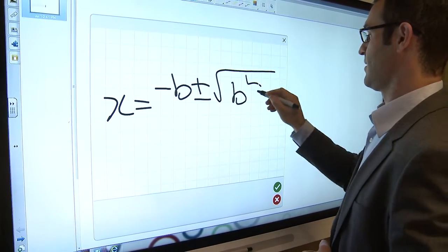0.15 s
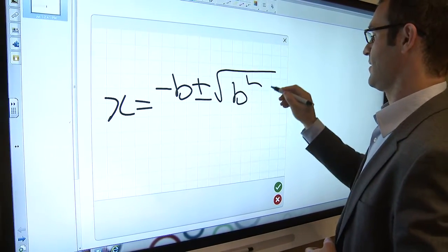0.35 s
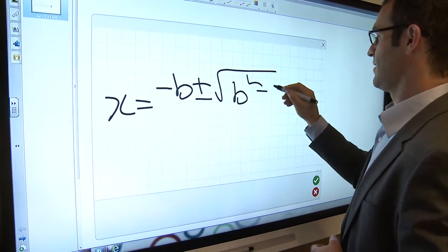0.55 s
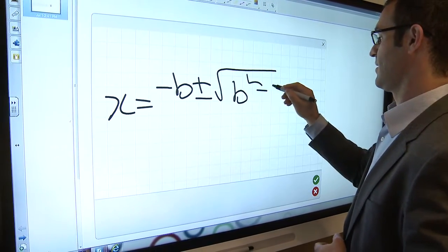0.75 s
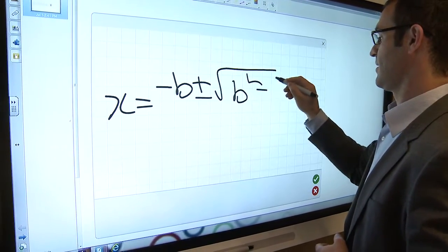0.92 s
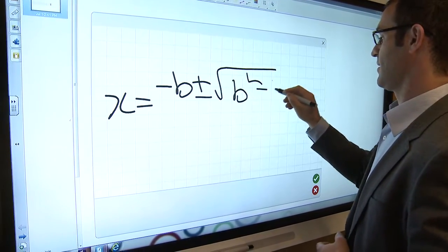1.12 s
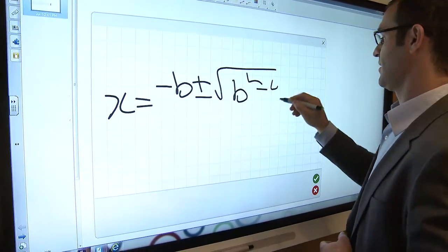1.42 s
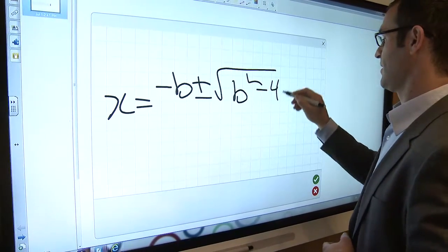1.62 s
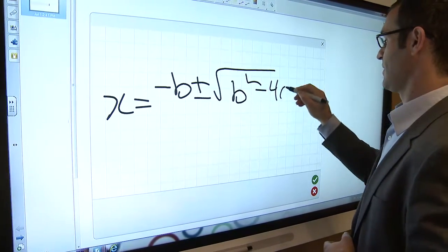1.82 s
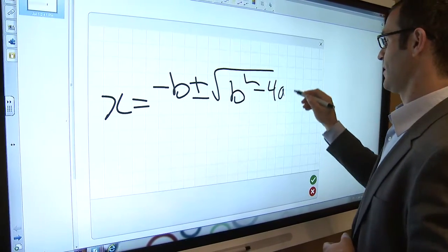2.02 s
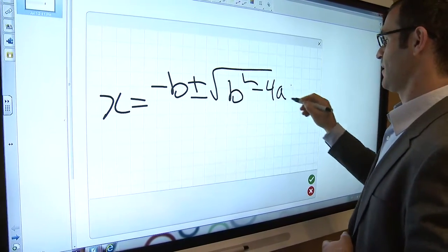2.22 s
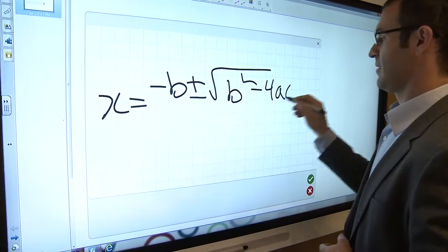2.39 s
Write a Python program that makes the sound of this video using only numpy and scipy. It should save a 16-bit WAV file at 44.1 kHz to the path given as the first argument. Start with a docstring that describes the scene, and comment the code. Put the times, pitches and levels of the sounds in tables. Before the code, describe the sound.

Hollow taps of a pen tip on a big glass panel, with faint writing hiss between them

```python
"""A quiet room with a large glass display, a writer at work on it with a stylus, one microphone.
Each touch-down knocks the panel, which booms briefly in its low modes and rattles its frame and casing.
The tip then slides with a faint hiss, filtered noise that follows the pen's speed.
The writer's sleeve rustles and he shifts his weight with soft thuds as he finishes, both shaped noise;
ventilation hums behind as steady noise and a few wavering tones."""
import sys
import numpy as np
from scipy import signal
from scipy.fft import rfft, irfft, next_fast_len
from scipy.io import wavfile
from scipy.ndimage import map_coordinates

SR = 44100
rng = np.random.default_rng(int(sys.argv[2]) if len(sys.argv) > 2 else 0)


def output_pcm(signal):
    """Save a mono or channel-first signal as 16-bit PCM at the path in sys.argv[1].

    Samples are clipped to [-1, 1] before scaling.
    """
    pcm = np.clip(np.atleast_2d(signal).T, -1, 1) * 32767
    wavfile.write(sys.argv[1], SR, np.round(pcm).astype(np.int16))


N = 112454  # length in samples

# Touch-downs on the glass. Each row: start in seconds, level of the whole knock in dB, then trims in dB
# of the glass click, pen tick and frame clatter, and height on the panel from 0 to 1.
TOUCH_DOWNS = [(0.2135, 1.4, -3, 2.5, 2, 0.78), (1.0205, 1.2, -1.5, -9, 5, 0.35),
               (1.3163, -3.5, -5, 4, 0.5, 0.11), (1.601, -3, -11, 0, -5, 0), (2.1408, -3.5, -7.5, 5, 0, 0)]
# Low modes of the panel. Each row: frequency in Hz, level in dB when struck on the writing line,
# level in dB when struck at height 1, seconds to full swing. The knock's level is added to both.
PANEL_MODES = [(176, -35, -22.5, 0.014), (207.4, -61, -24, 0.018), (221.8, -13.5, -17.5, 0.0056),
               (266.6, -30, -18.5, 0.01), (310.6, -21, -22.5, 0.0045), (403.1, -18, -17, 0.0042),
               (438.8, -22.5, -56, 0.0074), (504, -32, -15.5, 0.0016), (507.2, -38.5, -34.5, .010),
               (586.1, -32, -35, 0.011), (670.6, -43, -32.5, 0.0089), (784.5, -38.5, -38, 0.0052)]
# Colours of the frame's dense upper modes, the tip's click on glass, the casing's diffuse shudder and
# the pen's own resonances. Each row: frequency in Hz, relative spectral level in dB.
FRAME_COLOUR = [(100, -53), (300, 0), (600, 6), (850, -1), (1050, -3), (1400, -21), (2500, -19.5),
                (5000, -31), (16000, -66)]
CLICK_COLOUR = [(300, -20), (1000, 6), (1700, 8.5), (2800, -0.5), (3500, -2), (4400, 5.5), (5800, -28.5),
                (10000, -18), (16000, -27)]
CASING_COLOUR = [(100, -27), (180, -12), (240, -7.5), (310, 2), (420, -2.5), (600, 0), (800, -18),
                 (1100, -30), (2000, -41), (6000, -61)]
PEN_COLOUR = [(800, -25), (2000, -11), (3400, -5.5), (4400, -0.5), (5800, -6.5), (6800, -4), (7600, 0.5),
              (8100, -3.5), (8700, 1), (9500, -8.5), (16000, -16)]
# Base levels in dB, before trim, envelope and knock level; decays to -60 dB in seconds.
CLICK_DB, CLICK_T60 = -42.5, 0.025
FRAME_DB, FRAME_T60 = -40, 0.13
TICK_DB, TICK_T60 = -61, 0.053
CASING_DB, CASING_T60 = -30, 0.22
CASING_RISE_S, CASING_HIGH_DB = 0.012, 4  # the rise's time constant; dB added at height 1
RADIATE_HZ = 140  # the panel radiates little below this
TAP_ROOM_DB = -15.5


def taps():
    """The tip clicks and pushes the panel inward; where it lands sets the balance of the modes."""
    out = np.zeros(N)
    radiation = signal.butter(2, RADIATE_HZ, "high", fs=SR, output="sos")
    for start, db, click_db, tick_db, frame_db, height in TOUCH_DOWNS:
        t = since(start)
        knock = amp(CLICK_DB + click_db) * burst(t, 0.000069, CLICK_T60) * noise(CLICK_COLOUR)
        knock += amp(FRAME_DB + frame_db) * burst(t, 0.00017, FRAME_T60) * noise(FRAME_COLOUR)
        knock += amp(TICK_DB + tick_db) * burst(t, 0.00069, TICK_T60) * noise(PEN_COLOUR)
        for hz, line_db, high_db, swell in PANEL_MODES:
            swing = t / swell * np.exp(1 - t / swell)  # peaks at 1 after the swell time
            mode_db = line_db + height * (high_db - line_db)
            # the minus sign is the inward push
            knock -= amp(mode_db) * swing * np.sin(2 * np.pi * hz * t)
        casing = burst(t, CASING_RISE_S, CASING_T60) * noise(CASING_COLOUR)
        knock += amp(CASING_DB + CASING_HIGH_DB * height) * casing
        knock = signal.sosfilt(radiation, knock)
        out += amp(db) * (knock + amp(TAP_ROOM_DB) * room(knock))
    return out


# Pen strokes across the glass. Each row: start in seconds, end in seconds, level in dB,
# moment of top speed as a fraction of the stroke, level of the fine fizz in dB relative to the pen's hiss.
PEN_STROKES = [(-.07, 0.068, -60.5, 0.7, -9), (0.233, 0.356, -60.5, 0.55, -5),
               (1.02, 1.138, -64.5, 0.56, -8), (1.11, 1.22, -64.5, 0.6, -12), (1.329, 1.47, -63, 0.55, -4),
               (1.601, 1.692, -63.5, 0, -17), (1.62, 1.91, -64.5, 0.5, -5), (1.9, 2.014, -63, 0.28, -3),
               (2.12, 2.272, -64.5, 0.94, -1.5), (2.245, 2.344, -62, 0.64, 2)]
# Colour of the tip's fine fizz. Each row: frequency in Hz, relative spectral level in dB.
FIZZ_COLOUR = [(3000, -40), (8000, -11), (10500, -6.5), (13000, -1), (15500, 0)]
SPEED_LAW = 0.81  # hiss grows with speed to this power
GRIT_DB, DRIFT_DB = 0.7, 0.91  # fast and slower unevenness of the friction
STROKE_ROOM_DB = -12.5


def strokes():
    """In each stroke the pen speeds up and slows down; its friction hiss follows the speed."""
    t, out = np.arange(N) / SR, np.zeros(N)
    pen, fizz = noise(PEN_COLOUR), noise(FIZZ_COLOUR)
    for start, end, db, fastest, fizz_db in PEN_STROKES:
        top = start + np.clip(fastest, .05, .95) * (end - start)
        speed = np.sin(np.pi / 2 * np.interp(t, [start, top, end], [0, 1, 0]))
        hiss = nearby(pen, count=8) + amp(fizz_db) * nearby(fizz, count=8)
        out += amp(db) * speed ** SPEED_LAW * hiss
    out *= amp(GRIT_DB * wobble(400) + DRIFT_DB * wobble(45))
    return out + amp(STROKE_ROOM_DB) * room(out)


ECHO_S, ECHO_DB = .007, -15  # longest delay and level of each reflection


def nearby(x, count):
    """Close reflections off the glass and the hand ripple the colour, differently for each call."""
    echoes = sum(np.roll(x, int(SR * ECHO_S * u)) for u in rng.random(count))
    return unit(x + amp(ECHO_DB) * echoes)


# The sleeve's rustle as the arm moves. Each row: time in seconds, level in dB before a random wobble.
SLEEVE_LEVEL = [(0, -66), (.18, -62), (.4, -69), (.95, -80.5), (1.1, -69), (1.55, -62), (1.85, -60),
                (2.1, -63.5), (2.35, -62), (2.44, -58), (2.55, -56.5)]
# Soft thuds as the writer shifts his weight. Each row: start in seconds, level in dB before the envelope.
WEIGHT_SHIFTS = [(2.237, -35.5), (2.38, -32.5), (2.424, -35), (2.46, -42)]
# Colours of the cloth and of the thuds. Each row: frequency in Hz, relative spectral level in dB.
CLOTH_COLOUR = [(200, 13), (700, 5), (1500, -5), (2200, -6.5), (4200, -7), (6000, -13.5), (10000, -19.5),
                (16000, -29)]
THUD_COLOUR = [(30, -16), (80, -6.5), (155, 2), (280, -13), (450, -11), (590, -8.5), (800, -27),
               (1600, -34.5), (5000, -75)]
THUD_RISE_S, THUD_T60 = 0.0077, 0.16  # time constant of the rise; seconds to fall by 60 dB


def writer():
    """Cloth friction is noise of uneven level; each shift of weight is a muffled burst of noise."""
    t = np.arange(N) / SR
    sleeve_db = np.interp(t, *np.transpose(SLEEVE_LEVEL)) + 1.4 * wobble(39.84)
    sleeve = amp(sleeve_db) * noise(CLOTH_COLOUR)
    thuds = sum(amp(db) * burst(since(start), THUD_RISE_S, THUD_T60) for start, db in WEIGHT_SHIFTS)
    return sleeve + thuds * noise(THUD_COLOUR)


# Colour of the ventilation's air. Each row: frequency in Hz, relative spectral level in dB.
AIR_COLOUR = [(25, -12), (50, -8.5), (85, -2.5), (150, -4.5), (190, -4), (240, -7.5), (330, -10),
              (450, -12.5), (600, -13), (800, -22.5), (1200, -26), (2300, -36), (4000, -40), (6500, -45),
              (15500, -47)]
# Fan lines. Each row: frequency in Hz, rms level in dB before a random wobble.
FAN_LINES = [(113, -62.5), (177.6, -60.5), (446.8, -70), (5039, -94)]
AIR_DB = -50.5


def ventilation():
    """Steady air noise with a few fan lines, unsteady in level and phase."""
    t = np.arange(N) / SR
    hum = np.zeros(N)
    for hz, db in FAN_LINES:
        level = amp(db + 6 * wobble(6.3)) * np.sqrt(2)  # rms to peak
        hum += level * np.sin(2 * np.pi * hz * t + 0.23 * wobble(11))
    return amp(AIR_DB) * noise(AIR_COLOUR) + hum


# Decay of the room. Each row: frequency in Hz, seconds to fall by 60 dB.
ROOM_DECAY = [(120, 0.53), (250, 0.31), (600, 0.43), (2000, 0.39), (10000, 0.15)]
# Colour of the room's answer. Each row: frequency in Hz, relative level in dB.
ROOM_TINT = [(150, -3.5), (220, 0.5), (300, 1), (450, -2), (600, 1), (800, -0.5), (2000, 0)]
ROOM_DELAY_S = 0.019  # the tail fades in from half to one and a half times this


def room(x):
    """The room's diffuse answer is a noise tail; each frequency dies at its own speed."""
    hz, t, z = signal.stft(rng.standard_normal(SR // 2), SR, nperseg=256)
    decay_db = -60 * t / along(ROOM_DECAY, hz)[:, None]
    shaped = z * amp(along(ROOM_TINT, hz)[:, None] + decay_db)
    tail = signal.istft(shaped, SR, nperseg=256)[1]
    tail = tail * np.clip(np.arange(len(tail)) / SR / ROOM_DELAY_S - .5, 0, 1)
    return signal.fftconvolve(x, tail / np.linalg.norm(tail))[:N]


def amp(db):
    """Decibels to gain."""
    return 10 ** (np.asarray(db) / 20)


def along(points, hz):
    """(Hz, value) points read on a log frequency axis."""
    f, v = np.transpose(points)
    return np.interp(np.log(hz + 1), np.log(f + 1), v)


def filtered(x, response):
    """x with its spectrum multiplied by a response of frequency."""
    m = next_fast_len(N + SR // 2)  # padded against wrap-around
    return irfft(rfft(x, m) * response(np.fft.rfftfreq(m, 1 / SR)), m)[:N]


def unit(x):
    """x at rms 1."""
    return x / x.std()


def noise(colour):
    """Coloured noise of rms 1."""
    return unit(filtered(rng.standard_normal(N), lambda hz: amp(along(colour, hz))))


def wobble(rate):
    """A smooth random curve through so many random knots a second."""
    knots = rng.standard_normal(int(N * rate / SR) + 4)
    return map_coordinates(knots, [np.arange(N) * rate / SR])


def since(start):
    """Seconds since a moment, zero before it."""
    return np.maximum(np.arange(N) / SR - start, 0)


def burst(t, rise, t60):
    """Envelope that swells with a time constant and dies away by 60 dB in t60 seconds."""
    return (1 - np.exp(-t / rise)) * amp(-60 * t / t60)


def scene():
    """Everything at one microphone."""
    return (taps() + strokes() + writer() + ventilation())[None]


TOP_HZ = 15800


def record(dry):
    """The microphone's signal keeps nothing from its band limit up."""
    return filtered(dry[0], lambda hz: hz < TOP_HZ)[None]


dry = scene()
out = record(dry)
output_pcm(out)
```